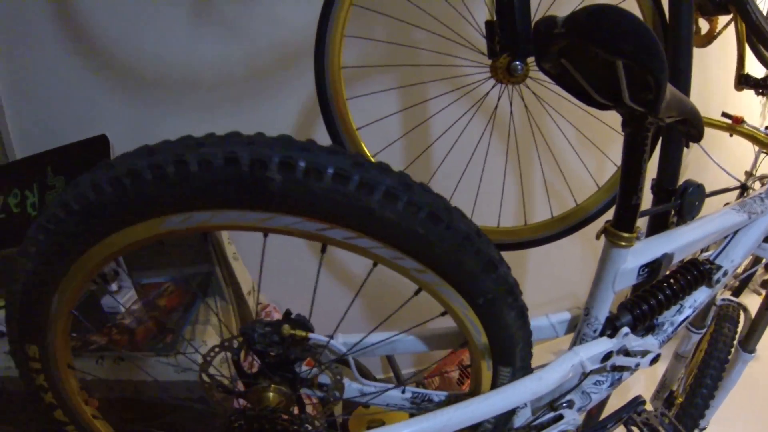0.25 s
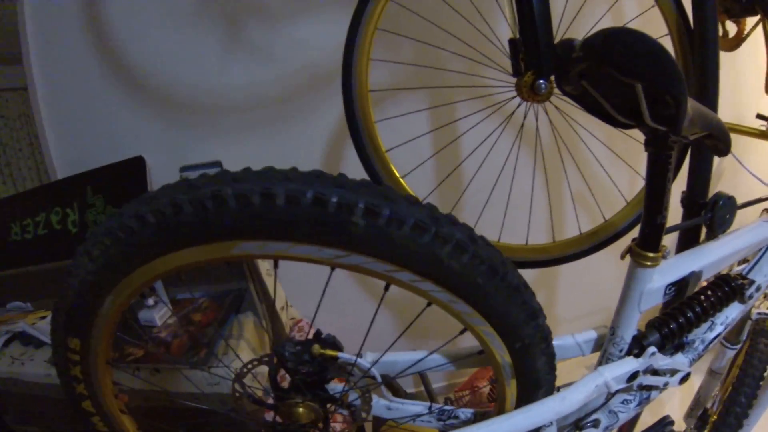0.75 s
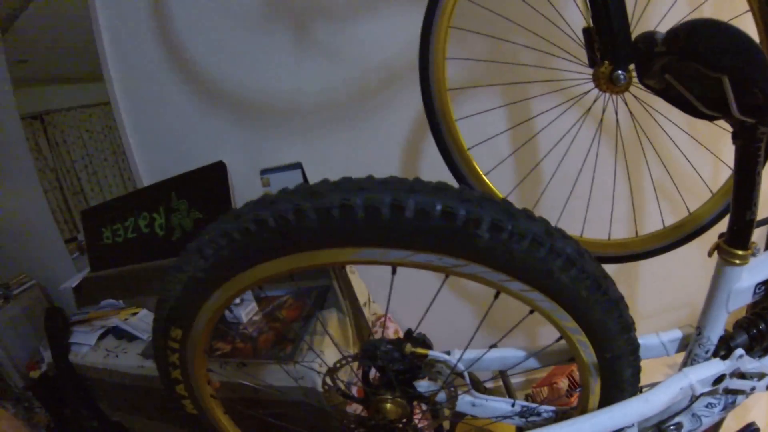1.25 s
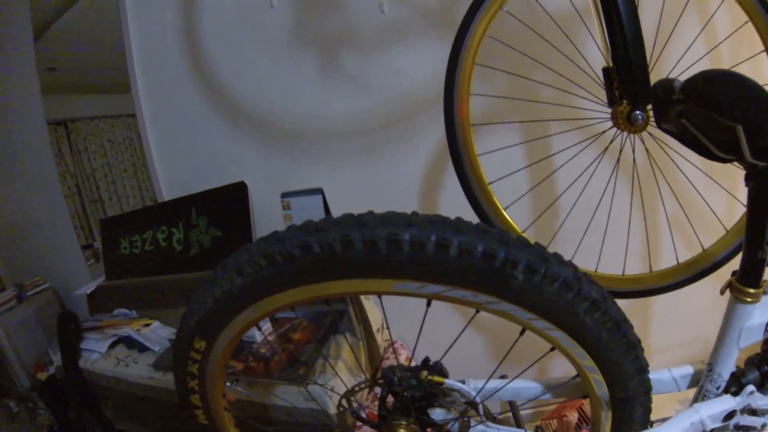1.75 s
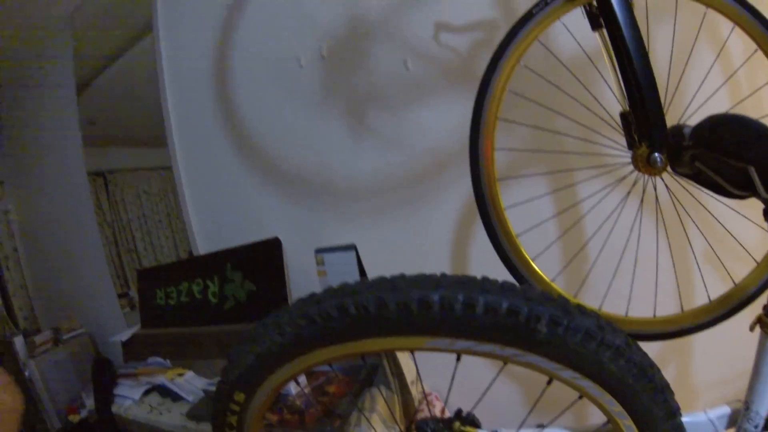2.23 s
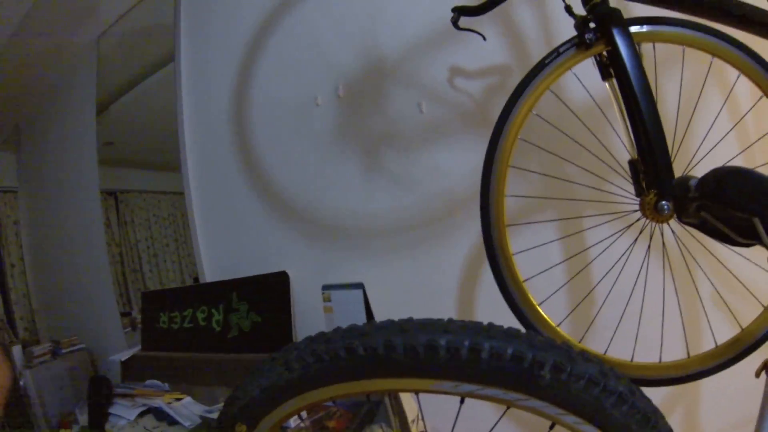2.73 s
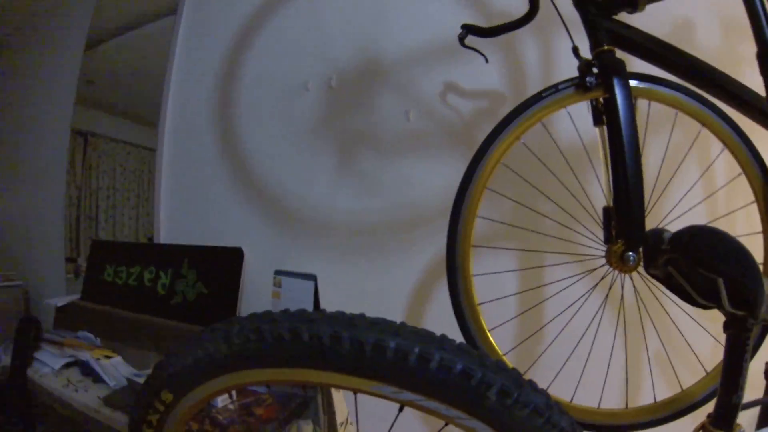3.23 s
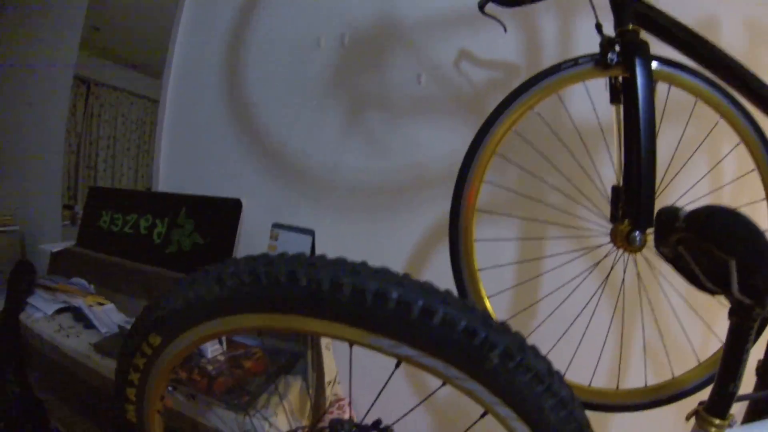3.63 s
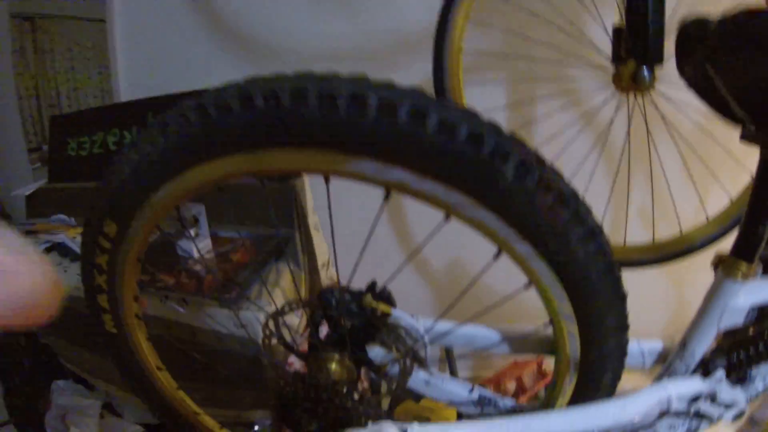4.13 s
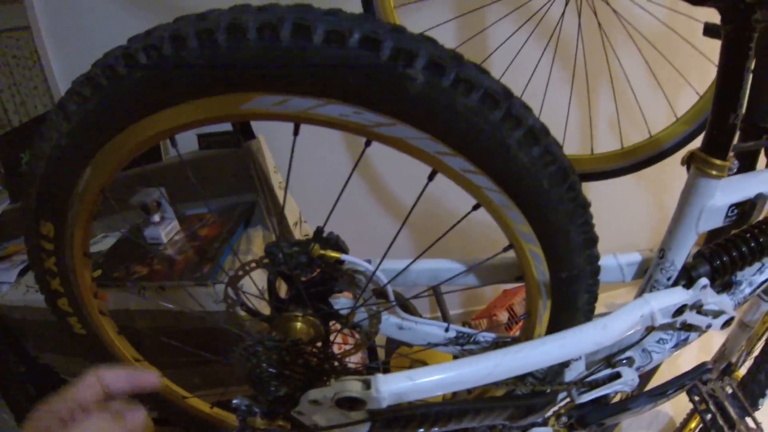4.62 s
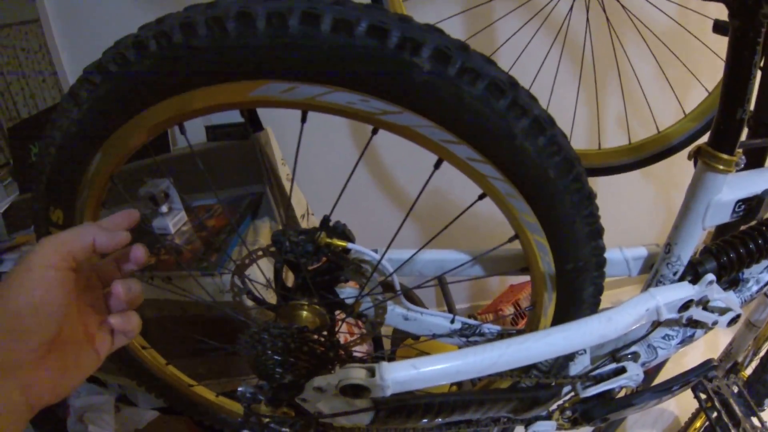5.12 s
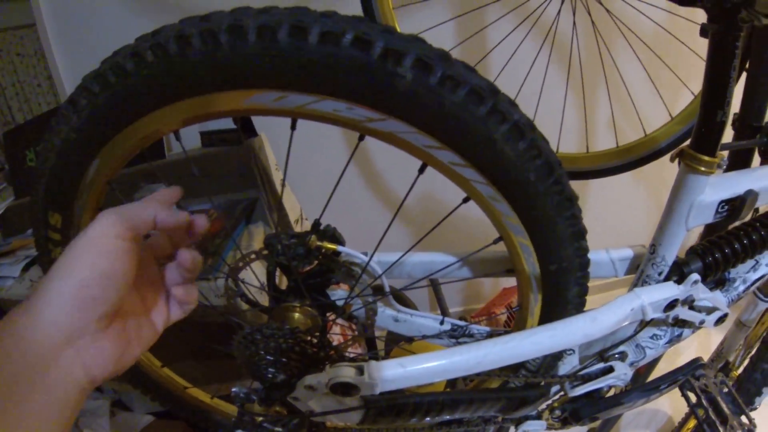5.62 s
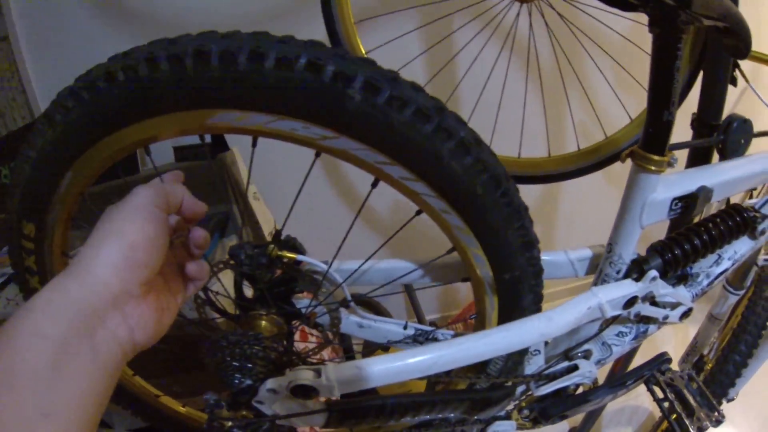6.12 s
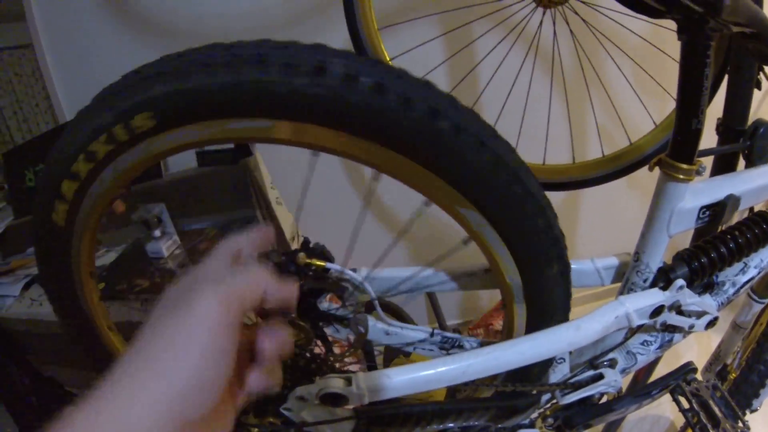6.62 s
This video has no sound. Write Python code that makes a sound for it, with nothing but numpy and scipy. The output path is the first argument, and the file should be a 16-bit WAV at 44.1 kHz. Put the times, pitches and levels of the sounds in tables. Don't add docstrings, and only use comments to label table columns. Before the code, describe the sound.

A small room with low, lumpy rumble and soft hiss, heard in mono by a built-in microphone. At 0.09 s a bicycle hub clicks loudly, metallic and ringing. Fingers tap, rub and crack the plastic housing from 0.33 to 0.75 s. Another loud click comes at 1.23 s with a softer follow-up, then a strong tap and rub at 1.3 s. Light rubbing continues, with sparse touches near 2 s. Bright plastic cracks cluster at 2.6-2.9 s, scrapes follow around 3.1 and 3.3 s, and the hardest crack, with a low thump, lands at 3.58 s. Smaller creaks end near 4.1 s. At 4.36 s an electrical pop slams and goes mute; a blip at 4.5 s opens a quiet stereo background. Its hiss rises, brightening at 5.1 s. Four even ratchet clicks ring at 6.34, 6.50, 6.65 and 6.81 s.

```python
import sys
import numpy as np
from scipy import signal
from scipy.fft import rfft, irfft
from scipy.io import wavfile
from scipy.ndimage import uniform_filter1d

SR = 44100
rng = np.random.default_rng(int(sys.argv[2]) if len(sys.argv) > 2 else 0)


def to_linear_factor(level_db):
    exponent = np.asarray(level_db, float) / 20
    return 10 ** exponent


def dump(signal):
    limited = np.clip(np.atleast_2d(signal).T, -1, 1)
    pcm = np.round(limited * 32767).astype(np.int16)
    wavfile.write(sys.argv[1], SR, pcm)


N = 302526
T = np.arange(N) / SR

BUILT_IN_OFF_S, STEREO_ON_S = 4.346, 4.5117
FRAME_S = .021333

# frequency in Hz, width in Hz, level in dB.
HOUSING_BODY = [(755, 89, 2), (1270, 370, -2.5), (1760, 130, 0.5), (2490, 300, -3)]
BODY_OCTAVES = np.log2([hz / HOUSING_BODY[1][0] for hz, _, _ in HOUSING_BODY])


def rms_one(x):
    return x / np.sqrt(np.mean(x ** 2) + 1e-20)


def in_time(rows, outside=None):
    s, *columns = np.transpose(rows)
    return [np.interp(T, s, column, outside, outside) for column in columns]


def at_hz(points, hz):
    table_hz, values = np.transpose(points)
    return np.interp(np.log(hz + 1), np.log(table_hz), values)


def colour(x, spectrum):
    size = 2 ** 14
    gain = to_linear_factor(at_hz(spectrum, np.fft.rfftfreq(size, 1 / SR)))
    cepstrum = irfft(np.log(gain))
    cepstrum[1:size // 2] *= 2
    cepstrum[size // 2 + 1:] = 0
    kernel = irfft(np.exp(rfft(cepstrum)))
    return signal.fftconvolve(np.atleast_2d(x), kernel[None], axes=1)[:, :N]


def drift(rate):
    knots = rng.standard_normal(int(N / SR * 40) + 2)
    return np.interp(T * np.clip(rate, .1, 39), np.arange(len(knots)), knots)


def resonate(x, modes):
    out = 0
    for k, (hz, width, level_db) in enumerate(modes):
        r = np.exp(-np.pi * width / SR)
        feedback = [1, -2 * r * np.cos(2 * np.pi * hz / SR), r * r]
        peak = signal.lfilter([1, 0, -1], feedback, x + 1e-18)
        out = out + (-1) ** k * to_linear_factor(level_db) * (1 - r * r) / 2 * peak
    return out


def add(track, s, piece):
    i = round(s * SR)
    track[i:i + len(piece)] += piece[:N - i]


def room_noise_built_in():
    # frequency in Hz, level in dB per Hz.
    rumble_and_hiss = [(12, -31.5), (20, -1.5), (44, 0.5), (104, -10), (193, -11), (228, -16), (293, -15.5),
                       (434, -22), (949, -26.5), (4300, -40.5), (5080, -43), (6360, -44), (11100, -47),
                       (15100, -41), (15500, -65.5)]
    white = rng.standard_normal(N)
    white = white + to_linear_factor(5.5) * resonate(white, [(5130, 200, 0)])
    noise = rms_one(colour(white, rumble_and_hiss)[0])

    treble_hz, treble_db, treble_opens_s = 11000, -7.5, 1.225
    top = signal.sosfiltfilt(signal.butter(4, treble_hz, "high", fs=SR, output="sos"), noise)
    noise = noise - top * (1 - to_linear_factor(treble_db)) * (T < treble_opens_s)

    lows = signal.sosfilt(signal.butter(2, 200, fs=SR, output="sos"), noise)
    lumps = lows * (to_linear_factor(2.2 * drift(9.7)) - 1)
    level_db = -47.5 - 0.05 * drift(7.4)
    return to_linear_factor(level_db) * (noise + lumps)


def room_noise_stereo():
    # frequency in Hz, level in dB per Hz.
    hiss = [(15, -29.5), (25, -15), (30, -46), (33, -12.5), (40, -17), (59, -31.5), (64, -33.5),
            (206, -36.5), (439, -47.5), (545, -49.5), (3920, -62.5), (11000, -64), (15000, -63.5),
            (15500, -95)]
    # frequency in Hz, left-right likeness (1 = the same in both).
    likeness = [(60, 0.81), (180, 1), (550, 1), (1650, 0.84), (4970, 0.47), (15000, 0.59)]
    shared = [(hz, 10 * np.log10((1 + np.clip(c, 0, .99)) / 2)) for hz, c in likeness]
    apart = [(hz, 10 * np.log10((1 - np.clip(c, 0, .99)) / 2)) for hz, c in likeness]
    mid, side = colour(rng.standard_normal((2, N)), hiss)
    pair = colour(mid, shared) + colour(side, apart) * [[1], [-1]]

    soft_treble_hz, soft_treble_db, treble_full_s = 1500, -5, 5.11
    lows = signal.lfilter(*signal.butter(1, soft_treble_hz, fs=SR), pair)
    treble_gain = np.where(T < treble_full_s, to_linear_factor(soft_treble_db), 1)
    pair = lows * to_linear_factor(2.7 * drift(12)) + (pair - lows) * treble_gain

    level_db = in_time([(4.44, -61.5), (5.35, -48)])[0]
    balance = to_linear_factor(np.array([[1.3], [-1.3]]))
    return to_linear_factor(level_db) * rms_one(pair) * balance


def pulse(start, end, height, release):
    return height * (T >= start) * np.clip(1 - (T - end) / release, 0, 1)


def settle(start, height, tau):
    return height * (T >= start) * np.exp(-np.maximum(T - start, 0) / tau)


def bias(c, jitter):
    offset, overshoot = [.037, .0335][c], [.019, .015][c]
    climb_db_per_s, top_db, droop_db_per_s = [14.5, 13.3][c], [13.4, 10.2][c], [1.1, 1.5][c]
    stair_hz, fade_end_s, first_frame_s = 480, 4.608, 4.6232

    stairs = np.floor(T * stair_hz) / stair_hz
    fade = np.clip((stairs - STEREO_ON_S) / (fade_end_s - STEREO_ON_S), 0, 1) ** 1.4

    since = np.maximum(T - fade_end_s, 0)
    frames = np.maximum(np.floor((T - first_frame_s) / FRAME_S) + 1, 0)
    topped_s = top_db / climb_db_per_s
    climb_db = climb_db_per_s * FRAME_S * frames
    droop_db = top_db - droop_db_per_s * (since - topped_s)
    gain_db = np.minimum(climb_db, droop_db)
    gain_db = gain_db + .06 * jitter[frames.astype(int)] * (since < topped_s)
    gain_db = uniform_filter1d(gain_db, size=9)
    return fade * (offset * to_linear_factor(gain_db) + overshoot * np.exp(-since / .03))


def switching():
    # start in seconds, end in seconds, height, release in seconds.
    rail_pop = [
        (4.3621, 4.36288, -1, .00008),
        (4.3621, 4.3643, -1, .00062),
    ]
    blip = [
        (4.50031, 4.50059, .49, .00003),
        (4.50066, 4.50127, .59, .00003),
    ]
    # start in seconds, height, time constant in seconds.
    rebound = [
        (4.36292, .078, .0075),
        (4.36445, .33, .0076),
    ]
    sag = [
        (4.51172, -.08, .0042),
        (4.51097, -.08, .0042),
    ]
    rest = [.015, .007]
    mute_s, slew = 4.3931, .45

    out, jitter = np.zeros((2, N)), rng.standard_normal(int(N / SR / FRAME_S))
    for c in range(2):
        pop = pulse(*rail_pop[c])
        recovery = settle(*rebound[c]) + rest[c] * (T > rebound[c][0])
        first = pop + (1 + pop) * recovery
        offset = first * (T < mute_s) + bias(c, jitter)
        slewed = uniform_filter1d(signal.lfilter([1 - slew], [1, -slew], offset), size=3)
        out[c] = slewed + pulse(*blip[c]) + settle(*sag[c])
    return out


def thumps():
    # start in seconds, peak in dB, frequency in Hz.
    grip_shifts = [(0.399, -34, 45), (1.306, -36, 45), (2.028, -35, 40), (2.112, -35.5, 40),
                   (2.45, -41, 40), (2.63, -32, 43.8), (2.811, -33.5, 45), (3.049, -30, 45),
                   (3.269, -34, 45), (3.35, -31, 40.5), (3.562, -16, 45), (3.588, -17.5, 45),
                   (4.044, -32, 45)]
    t, out = T[:3000], np.zeros(N)
    for s, peak_db, hz in grip_shifts:
        swing = np.sin(2 * np.pi * hz * t) * np.exp(-t / 0.012)
        add(out, s, to_linear_factor(peak_db + 3.0) * swing)
    return out


def contact(peak_db, contact_s):
    t = T[:1300]
    force = rng.standard_normal(len(t)) * np.exp(-t / contact_s)
    force[0] = 8.1
    return to_linear_factor(peak_db - 4.0) * force


def taps():
    # start in seconds, peak in dB, boom against peak in dB,
    # body tilt in dB per octave (depends on the spot touched).
    pad_taps = [(0.363, -33, -8, 7), (0.38, -36, -8, 21), (0.41, -51, 3, 7), (0.485, -49.5, 2, -3),
                (0.572, -38.5, -22, -6.5), (0.596, -48.5, 6, -1), (0.666, -29.5, -19, -3),
                (0.734, -26.5, -22, 5), (0.997, -38.5, -14, -3), (1.275, -38, -24, 7), (1.309, -13, -2, 1),
                (1.325, -19.5, -11.5, -4.5), (1.453, -41.5, -20, -10), (1.938, -41, -7.5, -6),
                (2.585, -45.5, -6, 11), (2.627, -23, -5.5, -9.5), (2.853, -33, -7, -5),
                (2.982, -38.5, -28, -8), (3.372, -45, -1, -2), (3.409, -48, 4, -3), (3.984, -51, -5, 7)]
    boom, pad = np.zeros(N), np.zeros((4, N))
    for s, peak_db, boom_db, tilt_db in pad_taps:
        force = contact(peak_db, contact_s=0.0025)
        add(boom, s, to_linear_factor(boom_db + 28) * force)
        add(pad.T, s, np.outer(force, to_linear_factor(17.0 + tilt_db * BODY_OCTAVES)))
    return boom, pad


def cracks():
    # start in seconds, peak in dB, boom against peak in dB, snap against peak in dB,
    # body tilt in dB per octave.
    nail_cracks = [(0.333, -26.5, -17, -15.5, -5), (0.398, -30, -4, -30, -7), (2.623, -17, -15, -47, -6.5),
                   (2.644, -29.5, -15.5, -26, -7.5), (2.78, -10.5, -19.5, -15.5, 3),
                   (2.788, -24, -13.5, -4, 0), (2.798, -16, -15, -14, 2), (2.81, -10.5, -27, -5.5, 4.5),
                   (2.826, -12.5, -16.5, -6.5, -6), (2.904, -11, -20, -6.5, 4.5),
                   (3.055, -28, -5, -12.5, -5), (3.094, -28, -12, -6, 0.9), (3.269, -22.5, -12, -10.5, -4),
                   (3.349, -35, -15, -10, 2), (3.384, -44, -10.5, -8, 0), (3.57, -21.5, -9, -10.5, 2.1),
                   (3.58, -3.5, -23.5, -8.5, 2.5), (3.853, -39, -18, -15, -2.5),
                   (3.968, -35.5, -9.5, -23, -1.5), (4.019, -39, -5.5, -20, -2), (4.039, -22, -18, -23, 5),
                   (4.078, -42.5, -7.5, -6.5, 5)]
    boom, nail, snap = np.zeros(N), np.zeros((4, N)), np.zeros(N)
    for s, peak_db, boom_db, snap_db, tilt_db in nail_cracks:
        force = contact(peak_db, contact_s=0.0031)
        add(boom, s, to_linear_factor(boom_db + 29) * force)
        add(nail.T, s, np.outer(force, to_linear_factor(10.0 + tilt_db * BODY_OCTAVES)))
        add(snap, s, to_linear_factor(snap_db + 11.5) * force)
    return boom, nail, snap


def rubs():
    # start in seconds, hardest in seconds, end in seconds (a row whose end lies before its start
    # stays silent), body in dB, snap against body in dB.
    strokes = [(0.33, 0.392, 0.44, -49.5, 5), (0.56, 0.72, 0.8, -53.5, -1.5), (0.79, 0.845, 1, -65, -16),
               (1.206, 1.29, 1.335, -40.5, -3), (1.416, 1.45, 3.9, -71, -12), (1.92, 1.958, 1.97, -59, -16),
               (2.749, 2.77, 2.9, -57.5, 8.5), (2.92, 2.945, 3.03, -50.5, -6),
               (3.02, 3.04, 3.134, -41.5, -1.5), (3.035, 3.10, 3.125, -61, 15.5),
               (3.258, 3.271, 3.288, -43.5, 11), (3.33, 3.38, 3.43, -60.5, 11),
               (3.556, 3.576, 3.48, -56, 6.5), (3.585, 3.59, 3.5, -63, -12), (3.953, 3.965, 3.97, -53, 8.5),
               (4.0, 4.02, 4.06, -58, 10), (4.028, 4.054, 4.06, -49.5, 12)]
    edge_db = -11.5
    tilt = to_linear_factor(13.5 - 5.5 * BODY_OCTAVES)[:, None]
    grains = rms_one(rng.standard_normal(N) * rng.exponential(1, N) ** 1.4) * to_linear_factor(2.5 * drift(38))
    skin, nail, snap = np.zeros(N), np.zeros(N), np.zeros(N)
    for start, hardest, end, body_db, snap_db in strokes:
        shape_db = in_time([(start, edge_db), (hardest, 0), (end, edge_db)], outside=-150)[0]
        friction = to_linear_factor(body_db + shape_db) * grains
        skin += friction
        nail += to_linear_factor(snap_db + 5.5) * friction
        snap += to_linear_factor(snap_db - 1.15) * friction
    return to_linear_factor(17.5) * skin, tilt * skin, nail, snap, skin


def housing():
    # frequency in Hz, width in Hz, level in dB.
    boom_modes = [(283, 120, 1.5), (427, 120, -0.5)]
    snap_modes = [(3812, 450, 1), (5040, 370, 2.5), (6220, 790, -5), (8540, 2300, -18.5), (12500, 900, -18)]
    lid_modes = [(2500, 25, -12), (2830, 30, -17), (4560, 25, -21)]
    skin_modes = [(920, 120, 20)]

    tap_boom, tap_pad = taps()
    crack_boom, crack_nail, crack_snap = cracks()
    rub_boom, rub_pad, rub_nail, rub_snap, skin = rubs()
    nail = crack_nail + rub_nail

    flesh = signal.butter(10, 1700, fs=SR, output="sos")
    drive = nail + signal.sosfilt(flesh, tap_pad + rub_pad + 1e-18)
    body = sum((-1) ** k * resonate(drive[k], [mode]) for k, mode in enumerate(HOUSING_BODY))
    boom = resonate(tap_boom + crack_boom + rub_boom, boom_modes)
    snap = resonate(crack_snap + rub_snap, snap_modes)
    lid = resonate(nail[-1], lid_modes)
    stick_slip = resonate(resonate(skin, skin_modes), [(skin_modes[0][0], 900, 0)])
    return boom + lid + body + stick_slip + snap


def room():
    # frequency in Hz, time to fall by 60 dB in seconds.
    room_decay = [(500, 0.91), (1300, 0.55), (3500, 0.47), (9000, 0.32), (15000, 0.17)]
    t, tail, band_edges = T[:SR // 2], 0, 400 * 2 ** np.arange(0, 5.6, .5)
    for low, high in zip(band_edges, band_edges[1:]):
        band_filter = signal.butter(2, [low, high], "band", fs=SR, output="sos")
        band = signal.sosfilt(band_filter, rng.standard_normal(len(t)))
        tail = tail + band * to_linear_factor(-60 * t / at_hz(room_decay, np.sqrt(low * high)))
    onset = 1 - np.exp(-t / 0.0019)
    return tail * onset / np.sqrt(np.sum(tail ** 2))


def pawls(drops, spectrum, chatter_s, ring_db, room_db, level_db):
    # frequency in Hz, level in dB, ring time in seconds (60 dB down after about
    hub_modes = [(1676, -31, 0.76), (3600, -8.5, 0.13), (4510, -20, 0.2), (5394, 0, 0.4),
                 (5846, -17.5, 0.73), (8419, -6, 0.74), (9820, -17, 0.21), (10310, 5, 0.085),
                 (10900, -26.5, 0.35), (11510, 3, 0.15), (11960, -17.5, 0.52), (12600, -18.5, 0.18),
                 (13990, -8.5, 0.28), (14950, -11, 0.22)]
    t, chatter, answer = T[:1500], np.zeros(N), np.zeros(N)
    for s, peak_db, spoke_hz in drops:
        grain = rng.standard_normal(len(t)) * rng.exponential(1, len(t)) ** .6
        burst = to_linear_factor(peak_db) * grain * np.minimum(t / 0.0014, 1) * np.exp(-t / chatter_s)
        spoke = resonate(burst, [(spoke_hz, 170, 5.5)])
        add(chatter, s, burst + spoke)
        add(answer, s, to_linear_factor(peak_db + 9) * room())
    hub = resonate(chatter, [(hz, 6 / t60, mode_db) for hz, mode_db, t60 in hub_modes])
    clicks = chatter + to_linear_factor(ring_db) * hub + to_linear_factor(room_db) * answer
    return to_linear_factor(level_db) * colour(clicks, spectrum)[0]


def pawls_built_in():
    # start in seconds, peak in dB, frequency in Hz of the spoke that answers.
    early_drops = [
        (0.049, -43, 4330),
        (0.0867, -10.5, 3350),
        (1.217, -45, 800),
        (1.2279, -11, 3600),
        (1.2506, -19, 4900),
    ]
    # frequency in Hz, level in dB per Hz.
    early_colour = [(290, -68.5), (500, -23), (868, -19), (1250, -15), (1510, -4.5), (2500, -12.5),
                    (3340, -5), (4210, -9.5), (4800, -2.5), (5710, -14), (8090, -8), (13100, -18),
                    (15100, -22), (16000, -51.5)]
    return pawls(early_drops, early_colour, chatter_s=0.007, ring_db=2.0, room_db=7.5, level_db=1.0)


def pawls_stereo():
    # start in seconds, peak in dB, frequency in Hz of the spoke that answers.
    late_drops = [
        (6.339, -12.5, 3330),
        (6.4967, -13.5, 10400),
        (6.6517, -13.5, 5840),
        (6.8059, -13.5, 8500),
    ]
    # frequency in Hz, level in dB per Hz.
    late_colour = [(290, -51.5), (500, -23.5), (729, -12.5), (1230, -18), (1500, -1), (1950, -3),
                   (2450, -10.5), (3450, -2), (5160, -8), (5900, -4), (7000, -4.5), (8300, 1),
                   (11500, -1.5), (15200, 1), (15800, -22.5)]
    return pawls(late_drops, late_colour, chatter_s=0.0051, ring_db=4.5, room_db=3.0, level_db=0.0)


def scene():
    mono = room_noise_built_in() + thumps() + housing() + pawls_built_in()
    stereo = room_noise_stereo() + pawls_stereo()
    return mono * (T < BUILT_IN_OFF_S) + stereo * (T > STEREO_ON_S + .012) + switching()


def roll_off(x):
    return signal.sosfilt(signal.butter(12, 16520, fs=SR, output="sos"), x)


def record(dry):
    band_limit = signal.butter(8, 16300, fs=SR, output="sos")
    limited = signal.sosfiltfilt(band_limit, np.clip(dry, -1, 1))
    return roll_off(np.clip(limited, -1, 1))


dry = scene()
out = record(dry)
dump(out)
```